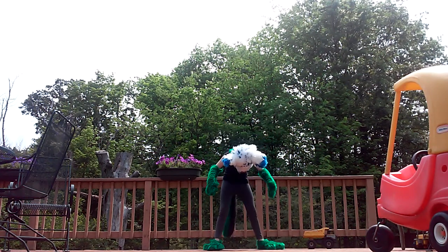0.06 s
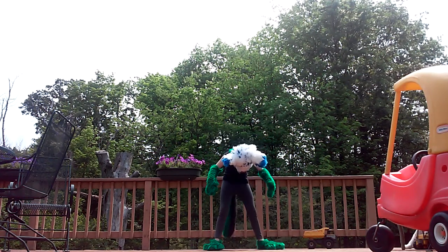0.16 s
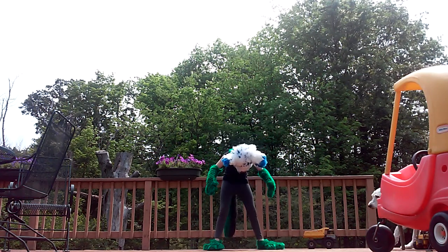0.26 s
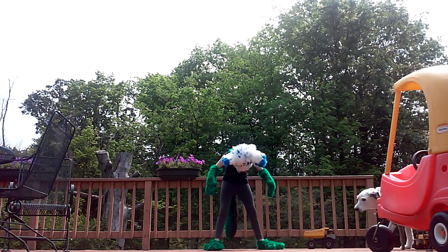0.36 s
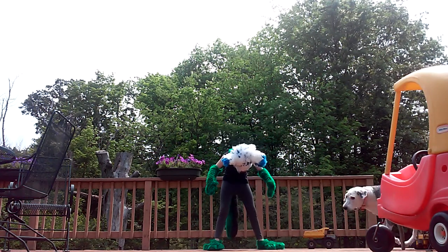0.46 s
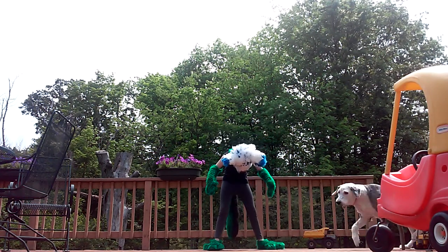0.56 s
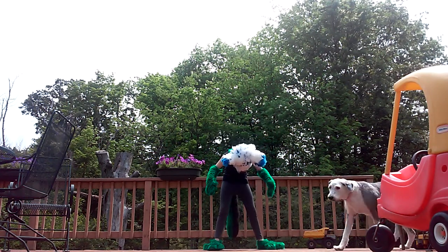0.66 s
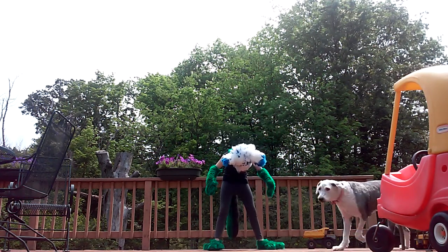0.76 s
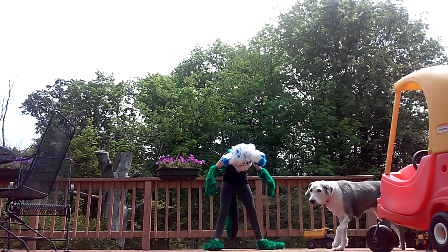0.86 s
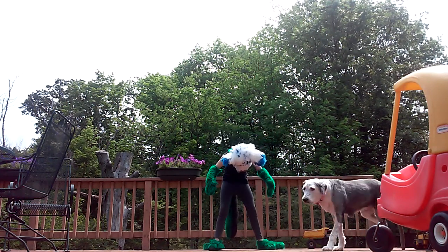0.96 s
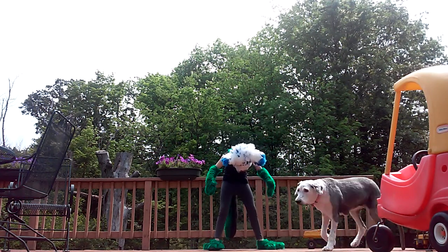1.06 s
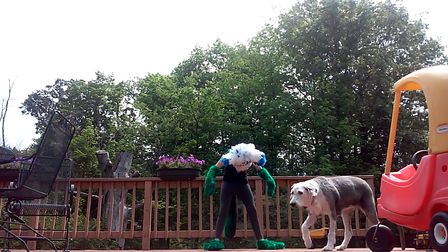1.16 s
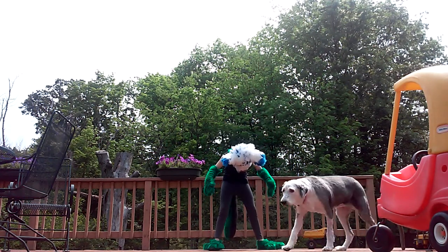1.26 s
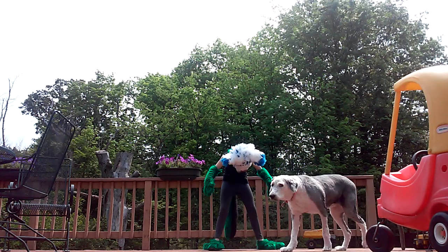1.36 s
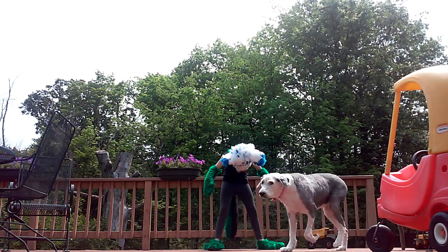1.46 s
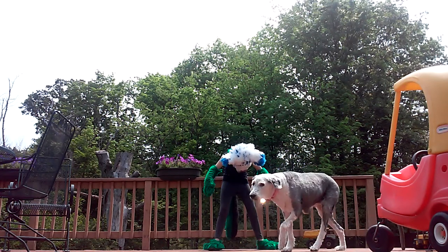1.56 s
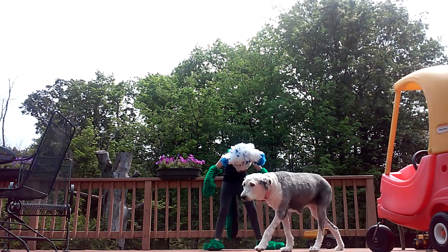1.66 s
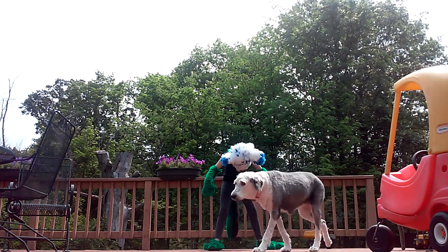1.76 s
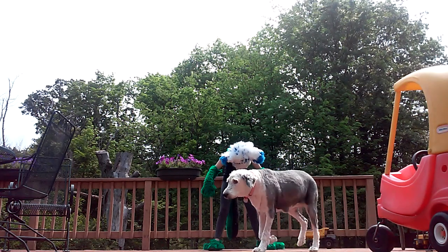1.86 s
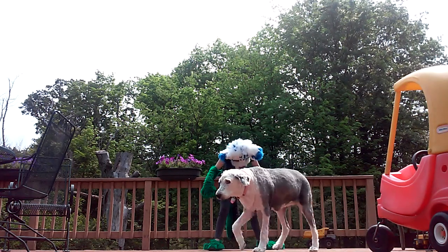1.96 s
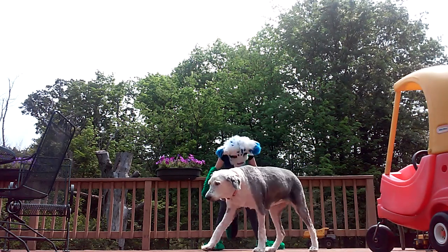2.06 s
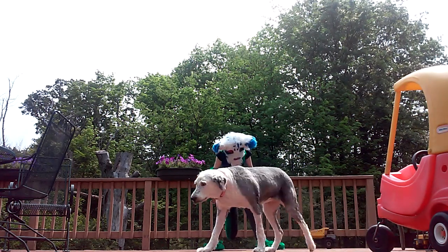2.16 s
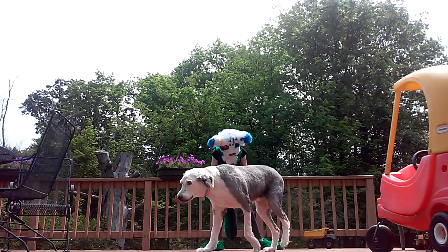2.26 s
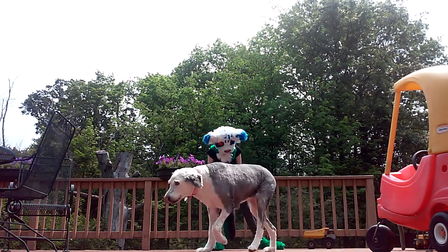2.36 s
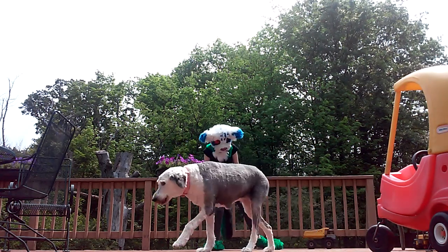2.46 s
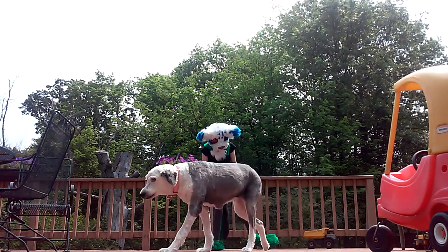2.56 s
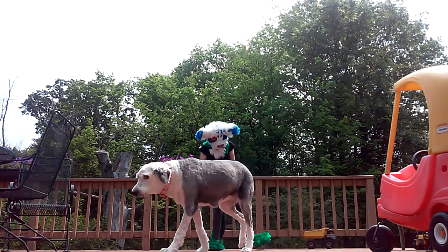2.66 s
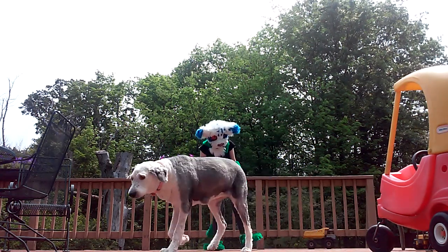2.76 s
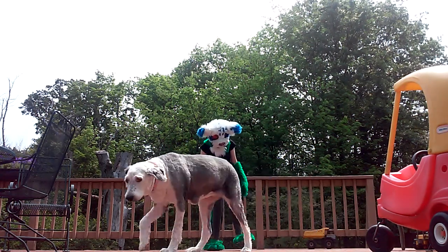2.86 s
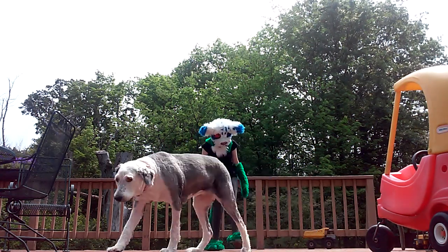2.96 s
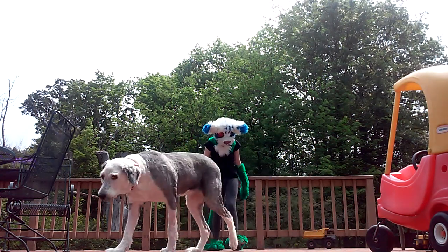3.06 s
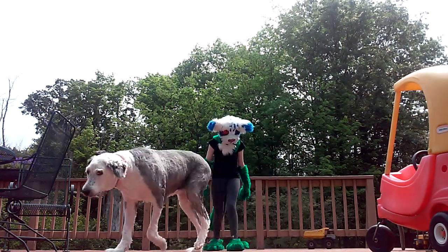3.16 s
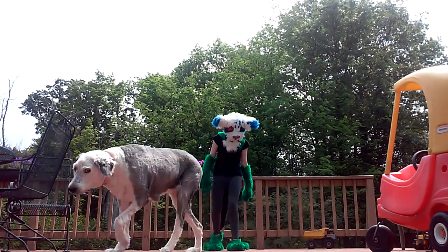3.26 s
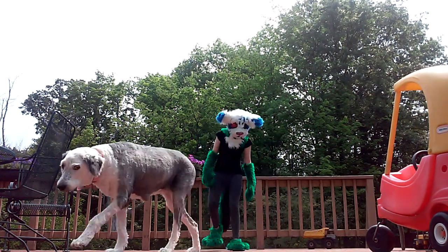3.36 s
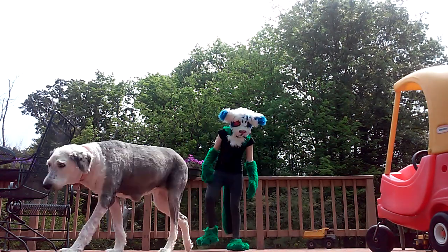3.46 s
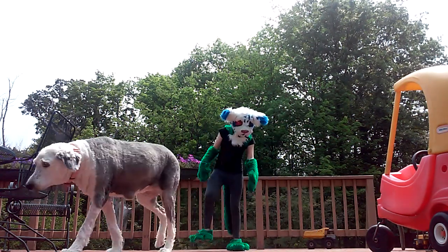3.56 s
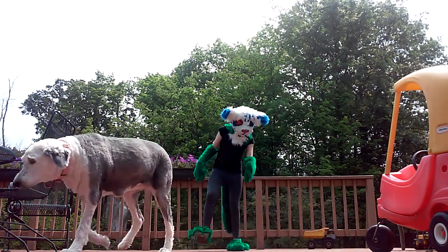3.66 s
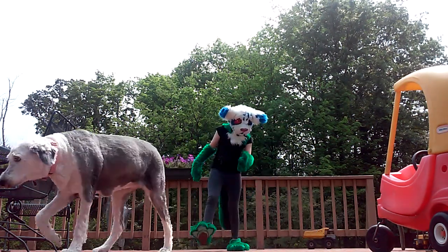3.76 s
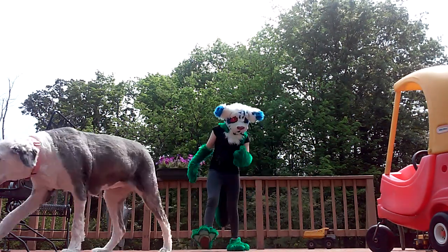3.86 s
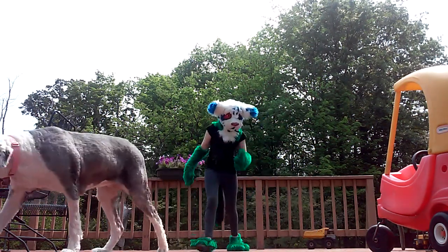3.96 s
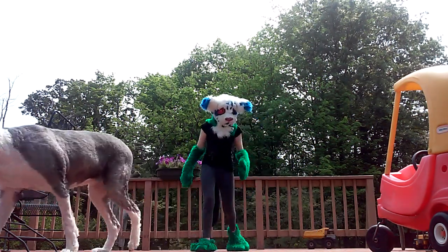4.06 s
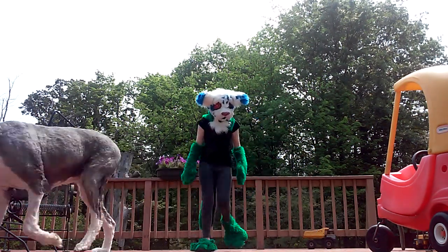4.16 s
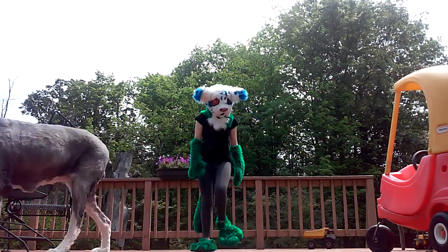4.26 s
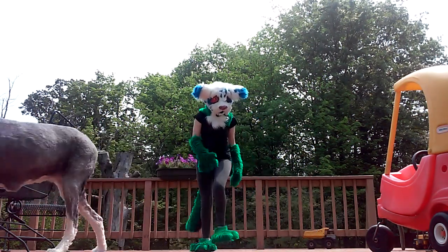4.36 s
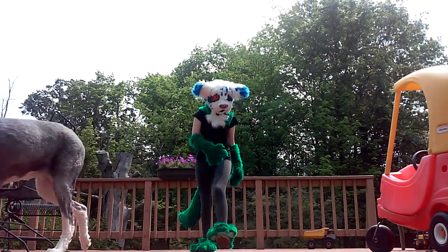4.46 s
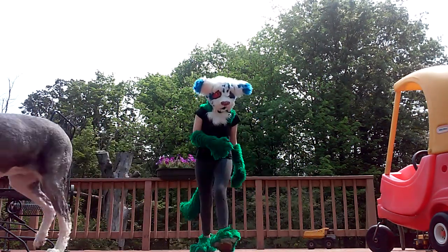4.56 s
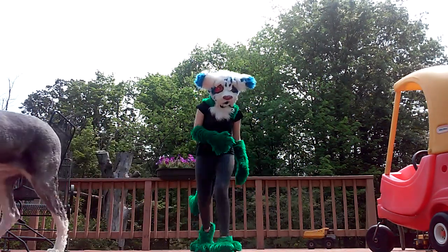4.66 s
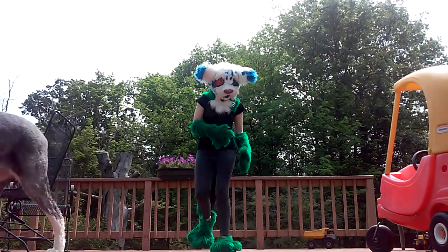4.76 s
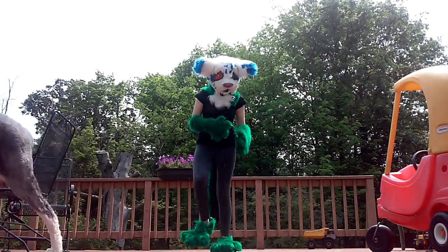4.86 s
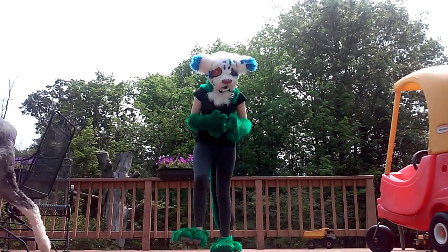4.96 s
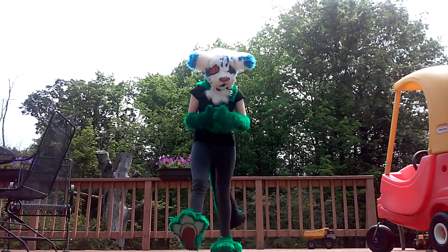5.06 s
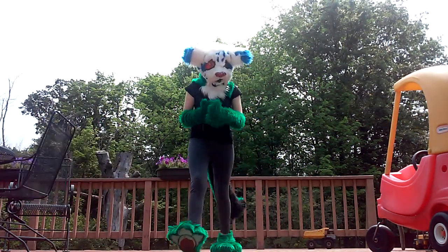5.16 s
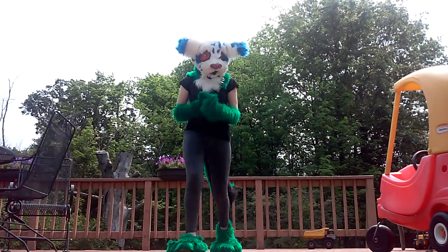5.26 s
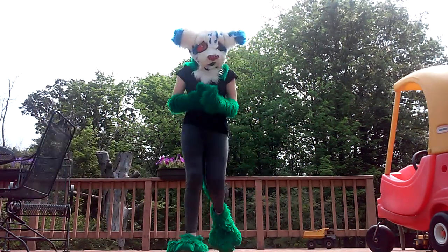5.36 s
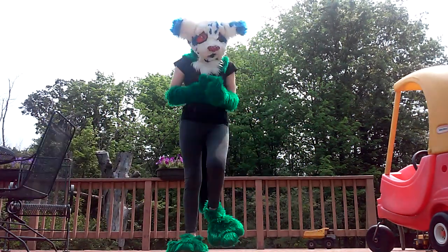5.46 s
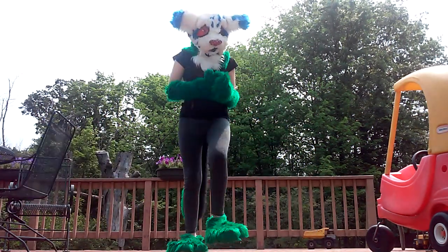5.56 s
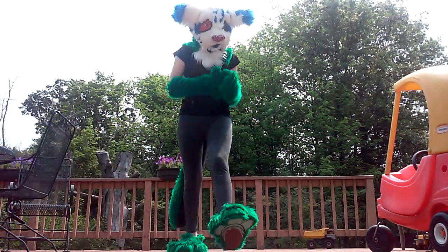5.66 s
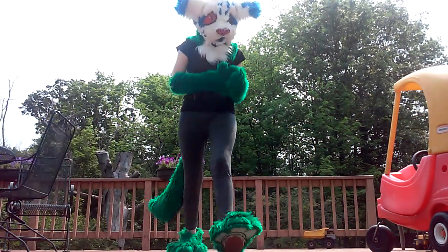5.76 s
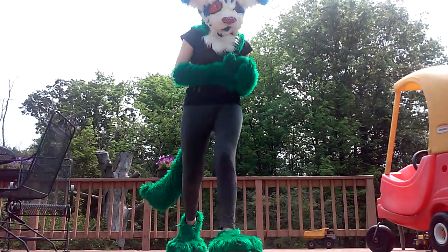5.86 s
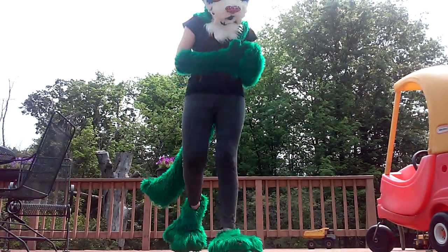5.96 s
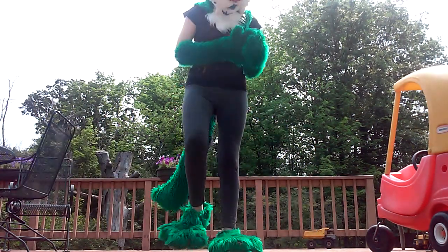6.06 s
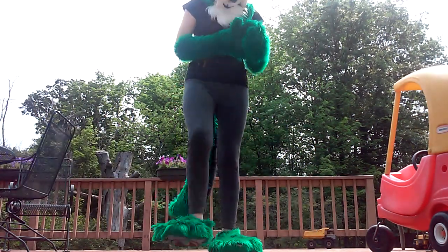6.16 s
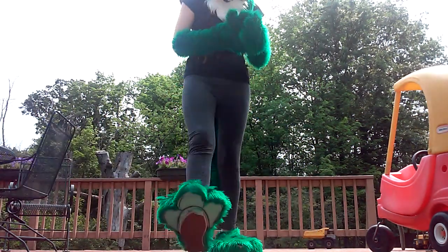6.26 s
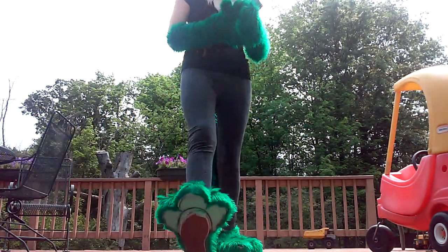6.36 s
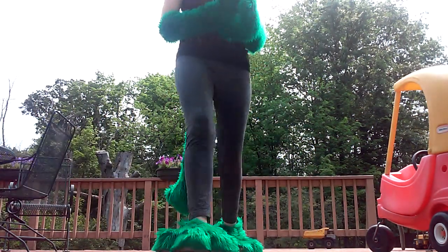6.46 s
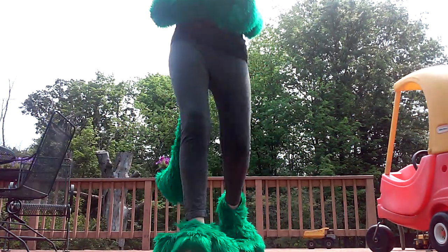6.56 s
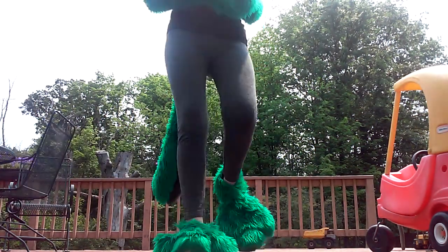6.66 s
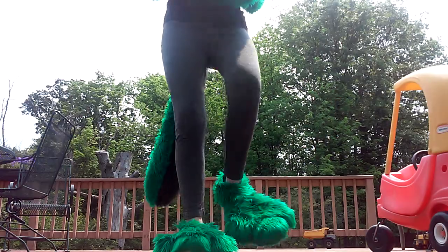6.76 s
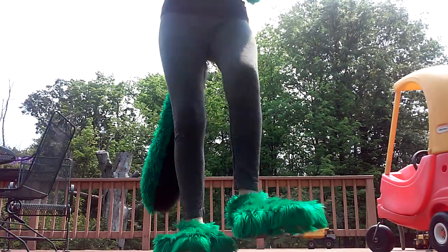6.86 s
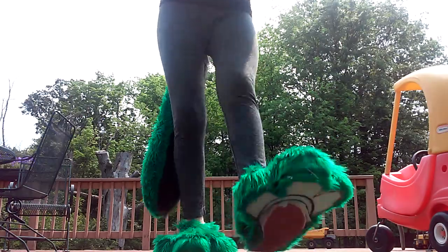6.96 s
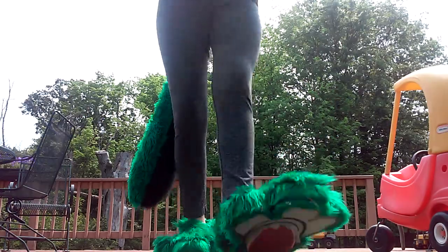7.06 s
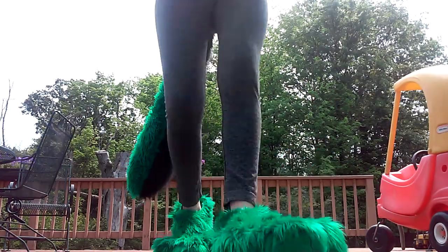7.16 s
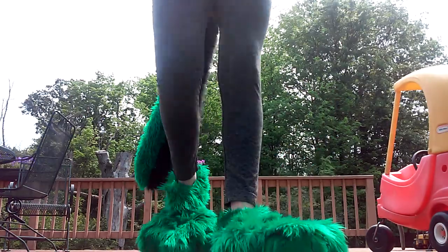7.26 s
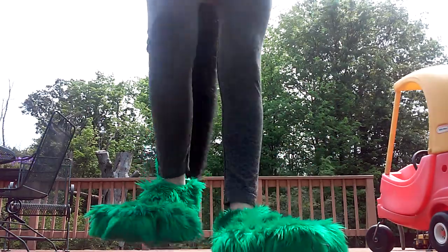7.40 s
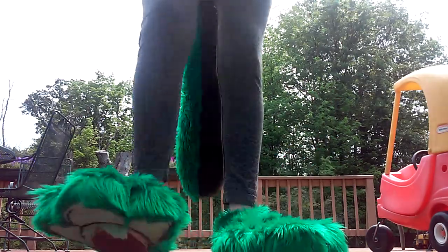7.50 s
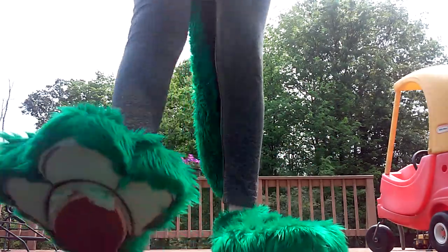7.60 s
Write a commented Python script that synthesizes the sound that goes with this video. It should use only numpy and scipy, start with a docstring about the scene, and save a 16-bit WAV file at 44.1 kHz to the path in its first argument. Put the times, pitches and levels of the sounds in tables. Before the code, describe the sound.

Dog tags clink and claws click over hollow deck boards, followed by slow, deep, padded footfalls approaching over a faint wavering hum.

```python
"""A wooden deck outdoors: a dog walks across, claws tapping and collar tags clinking, while padded feet
step heel and toe towards a microphone lying on the boards. Footfalls are short tone bursts with scattered
repeats, claws are grainy noise ringing board modes, tags are decaying sines with ticks. Shaped noise makes
the rumble, scuffing, high hiss and air; a low wavering tone hums underneath."""
import sys
import numpy as np
from scipy import signal
from scipy.fft import rfft, irfft
from scipy.io import wavfile
from scipy.ndimage import uniform_filter1d

SR = 44100
rng = np.random.default_rng(int(sys.argv[2]) if len(sys.argv) > 2 else 0)


def generate_wav(sig):
    """Save sig (samples, or channels by samples) to the path in sys.argv[1] as 16-bit PCM at SR."""
    pcm = np.round(np.clip(np.atleast_2d(sig).T, -1, 1) * 32767).astype(np.int16)
    wavfile.write(sys.argv[1], SR, pcm)


N = 336483


def gain_of(db):
    """Decibels to amplitude gain."""
    return 10 ** (np.asarray(db) / 20)


def evened(x):
    """Scales to rms 1."""
    return x / np.sqrt(np.mean(x ** 2) + 1e-20)


def add(mix, start_s, sound):
    """Mixes a sound in at a time, cut at the end of the mix."""
    part = mix[round(start_s * SR):][:len(sound)]
    part += sound[:len(part)]


def along(table, column):
    """One column of a timed curve, interpolated at every sample."""
    rows = np.array(table)
    return np.interp(np.arange(N) / SR, rows[:, 0], rows[:, column])


def coloured(x, spectrum, bright_db=0):
    """Filters by a (freq_hz, gain_db) table; bright_db fades in from 1600 to 2200 Hz."""
    table_hz, table_db = np.transpose(spectrum)
    hz = np.fft.rfftfreq(len(x), 1 / SR)
    db = np.interp(np.log(hz + 1), np.log(table_hz + 1), table_db, left=-90, right=-90)
    db += bright_db * np.clip((hz - 1600) / 600, 0, 1)
    return irfft(rfft(x) * gain_of(db), len(x))


def lumpy(window_s, spread_db):
    """White noise whose level wanders at random, smoothed over window_s."""
    window = np.hanning(int(window_s * SR) + 3)
    slow = evened(signal.oaconvolve(rng.standard_normal(N), window, "same"))
    return rng.standard_normal(N) * gain_of(spread_db * slow)


# hum level: time_s, level_db
HUM_LEVEL = [(0, -36), (.5, -51), (1.35, -41.5), (1.85, -51), (2.35, -34), (3.0, -44.5), (3.9, -47),
             (4.1, -33.5), (4.8, -35.5), (5.65, -43), (6.15, -37.5), (6.4, -56.5), (7.1, -52), (7.3, -41),
             (7.63, -39)]
HUM_HZ = 105.05


def hum():
    """A low tone; slow complex noise makes its level and phase waver."""
    window = np.hanning(int(.07 * SR))[None]
    waver = signal.oaconvolve(rng.standard_normal((2, N)), window, "same", axes=1)
    wobble = 1 + 0.51 * (evened(waver[0]) + 1j * evened(waver[1]))
    carrier = np.exp(2j * np.pi * HUM_HZ * np.arange(N) / SR)
    return gain_of(along(HUM_LEVEL, 1)) * evened((wobble * carrier).real)


# colour of the air: freq_hz, gain_db
AIR_COLOUR = [(12, -66), (20, -12), (117, 5.5), (169, -30), (314, -30), (599, -45), (1510, -24.5),
              (1900, -74), (2510, -45), (5360, -39), (13200, -36), (15750, -30), (16000, -89)]
# colour of the deep sway: freq_hz, gain_db
SWAY_COLOUR = [(12, -54), (25, -33), (45, -15), (75, -11), (95, -10.5), (130, -38)]
AIR_DB = -49.5
SWAY_DB, SWAY_DB_PER_HUM_DB = -48.5, 0.72  # SWAY_DB holds at a hum of -43 dB


def outdoors():
    """Faint air noise of slowly wandering level, and a deep gusty sway that swells with the hum."""
    air = gain_of(AIR_DB) * evened(coloured(lumpy(0.95, 1.0), AIR_COLOUR))
    sway_db = SWAY_DB + SWAY_DB_PER_HUM_DB * (along(HUM_LEVEL, 1) + 43)
    sway = gain_of(sway_db) * evened(coloured(lumpy(0.097, 1.5), SWAY_COLOUR))
    return air + sway


# swells of hiss and scuffing, some as short as the crack of a knock:
# middle_s, hiss_db, length_s, scuff_db
SWELLS = [(.55, -50, 0.27, -57), (0.702, -37, 0.19, -58), (1.436, -51, 0.27, -60.5),
          (2.434, -69, 0.47, -60), (2.523, -44, 0.15, -57.5), (2.834, -48, 0.29, -63),
          (4.892, -40.5, 0.085, -57), (5.42, -50.5, 0.96, -68), (6.055, -45, 0.53, -60.5),
          (6.708, -50.5, 0.34, -64.5), (7.137, -46, 0.039, -67), (7.32, -46.5, 0.73, -72),
          (7.416, -32.5, 0.045, -51)]


def swelling(column):
    """Summed power of the swells over time, from the hiss (1) or scuff (3) column."""
    power = np.zeros(N)
    for row in SWELLS:
        middle_s, level_db, length_s = row[0], row[column], row[2]
        shape = np.hanning(int(length_s * SR)) ** 2
        add(power, middle_s - length_s / 2, gain_of(2 * level_db) * shape)
    return power


# sudden rises of high hiss, each fading slowly: start_s, level_db
HISS_RISES = [(0, -53), (0.069, -42.5), (.24, -41.5), (0.478, -38.5), (.887, -43), (1.25, -45.5),
              (1.33, -46), (1.72, -45.5), (2.07, -48), (2.286, -43), (2.8, -45), (3.07, -50),
              (3.501, -56.5), (3.93, -55.5), (4.148, -49.5), (4.4, -47), (4.61, -45), (4.87, -51),
              (5.18, -51), (5.779, -51.5), (5.87, -52), (6.543, -51), (6.94, -51.5)]
# colour of the high hiss: freq_hz, gain_db
HISS_COLOUR = [(2650, -25), (4500, -32), (6340, -19.5), (9120, -11.5), (9950, -12.5), (13000, -2.5),
               (15750, -15), (15950, -51), (16200, -79)]
HISS_T60_S = 1.68


def hiss():
    """High noise that rises suddenly and fades slowly; the powers of rises and swells add."""
    power, t = swelling(column=1), np.arange(SR) / SR
    for start_s, level_db in HISS_RISES:
        onset = np.minimum(t / 0.0025, 1)
        add(power, start_s, gain_of(2 * (level_db - 60 * t / HISS_T60_S)) * onset)
    return np.sqrt(power) * evened(coloured(lumpy(0.0071, 1.65), HISS_COLOUR))


def grit():
    """Noise bursts from scattered small catches of pads on the wood grain, some larger."""
    sizes_db = 6.9 * np.minimum(rng.exponential(1, N), 2)
    catches = (rng.random(N) < 40 / SR) * gain_of(sizes_db)  # about 40 per s
    decay = gain_of(-60 * np.arange(2000) / SR / 0.13)
    return 0.3 * signal.oaconvolve(catches, decay)[:N] * rng.standard_normal(N)


# how hard walking shakes the deck: time_s, rumble_db
MOTION = [(0, -42), (.6, -34.5), (.85, -40), (1.4, -35.5), (1.7, -46), (2.12, -47.5), (2.45, -37.5),
          (3.0, -46), (3.4, -46.5), (3.85, -59.5), (4.15, -38.5), (4.5, -39.5), (5.1, -47.5), (5.75, -46.5),
          (6.08, -44), (6.35, -47.5), (7.1, -50.5), (7.3, -35.5), (7.63, -44)]
# colour of the shaken boards: freq_hz, gain_db
RUMBLE_COLOUR = [(71, -14), (120, -8), (134, -2.5), (205, -0.5), (349, -2), (441, -10), (511, -15),
                 (650, -34.5), (840, -69)]
# colour of pads on planks: freq_hz, gain_db
SCUFF_COLOUR = [(350, -40), (600, -5), (704, -9), (863, 0.5), (1010, 0), (1230, -26.5), (1470, -25),
                (1750, -18.5), (2270, -17.5), (2710, -20), (3020, -15), (3540, -25), (4380, -20),
                (5000, -41), (6500, -92)]
# colour of the rasp within the swells: freq_hz, gain_db
RASP_COLOUR = [(1100, -16), (1480, 3), (1950, -33)]
SCUFF_DB, SCUFF_DB_PER_RUMBLE_DB = -58, 0.54  # SCUFF_DB holds at a rumble of -40.5 dB
BOOM_DB, BOOM_PITCH_FACTOR = 18, 1.21  # low sound of a swell: over its scuffing, above the rumble


def motion():
    """Walking shakes the boards and scuffs the planks: rumble, boom, rasp and scuff as shaped noise."""
    rumble_db = along(MOTION, 1)
    rumble = gain_of(rumble_db) * evened(coloured(lumpy(0.056, 2.86), RUMBLE_COLOUR))
    swell = np.sqrt(swelling(column=3))
    boom_colour = np.multiply(RUMBLE_COLOUR, [BOOM_PITCH_FACTOR, 1])
    boom = gain_of(BOOM_DB) * swell * evened(coloured(lumpy(0.09, 3.7), boom_colour))
    rasp = swell * evened(coloured(lumpy(0.018, 4.9), RASP_COLOUR))
    scuff_db = SCUFF_DB + SCUFF_DB_PER_RUMBLE_DB * (rumble_db + 40.5)
    scuff = evened(coloured(lumpy(0.027, 1.8) + grit(), SCUFF_COLOUR))
    return rumble + boom + rasp + (gain_of(scuff_db) + swell) * scuff


# contacts sounding the low note of the collar hardware: start_s, level_db, ring_t60_s
PINGS = [(0.1635, -50, 0.25), (0.512, -37, 0.29), (0.5893, -46.5, 0.21), (0.6659, -53, 0.51),
         (0.8866, -42, 0.22), (0.949, -46.5, 0.14), (1.328, -46, 0.093), (1.7205, -53, 0.21),
         (2.799, -35.5, 0.13), (2.842, -37.5, 0.084), (2.875, -53, 0.19), (4.7277, -57, 0.22),
         (5.4061, -59, 0.19), (5.895, -52, 0.22), (5.9686, -46, 0.06), (6.162, -48, 0.077)]
PING_HZ = 6187


def pings():
    """A decaying sine of wavering level, damped by the next contact."""
    out, t = np.zeros(N), np.arange(SR // 2) / SR
    ends_s = [row[0] for row in PINGS[1:]] + [N / SR]
    for (start_s, level_db, t60_s), end_s in zip(PINGS, ends_s):
        noise = rng.standard_normal(len(t))
        swing = gain_of(2.5 * evened(signal.oaconvolve(noise, np.hanning(900), "same")))
        stopped = np.clip((end_s - start_s - t) / .001, 0, 1)
        level = gain_of(level_db - 60 * t / max(t60_s, .02)) * swing * stopped
        onset = np.minimum(t / 0.00055, 1)
        add(out, start_s, level * onset * np.sin(2 * np.pi * PING_HZ * t))
    return out


# contacts of the two tags: start_s, tick_db, base_t60_s, first_tag_db, second_tag_db
CLINKS = [(0.0697, -5, 0.13, -25, -38), (0.1632, -15, .36, -24, -28), (0.246, -23, 0.062, -20, -19.5),
          (0.387, -11, 0.13, -41.5, -27), (.449, -14, 0.26, -33, -27), (0.481, -1, .12, -36, -37),
          (0.49, -0.5, 0.44, -20, -15), (0.5152, -21, 0.31, -13, -13), (0.5654, 1.5, 0.066, -18, -18),
          (.6665, -36, 0.39, -31, -41), (0.737, -15, 0.23, -26.5, -31), (.887, -2.5, 0.58, -20, -13.5),
          (0.9232, -8, 0.25, -24, -16), (0.99, -2.5, 0.33, -31, -24.5), (1.246, -28, 0.081, -21.5, -51),
          (1.327, -13, 0.043, -8.5, -25), (1.358, -13, 0.27, -27, -34), (1.719, -6.5, 0.17, -18, -8),
          (1.8714, -15, 0.19, -40, -38), (2.048, -40, 0.042, -60, -44), (2.074, -24, 0.034, -45, -23.5),
          (2.1213, -28, 0.041, -26, -29), (2.1585, -14, 0.16, -45, -28), (2.2842, -3, 0.12, -37, -10.5),
          (2.3144, -8, 0.031, -18, -40), (2.7968, -1.5, 0.44, -11, -4.5), (2.811, 0, 0.18, -12, -19),
          (2.821, -8, 0.92, -16, -7), (2.839, 2, 0.17, -25, -14), (2.852, -10, .15, -26, -20),
          (2.873, -20, .15, -28, -13), (2.892, -14, .12, -33, -26), (2.997, -16, .04, -50, -50),
          (3.189, -7, 0.23, -50, -27), (3.51, -36, 0.12, -38, -39), (3.575, -29, 0.045, -28, -49),
          (4.155, -12.5, .06, -51, -54), (4.225, -14.5, 0.076, -45, -23), (4.398, -3.5, 0.055, -42, -37),
          (4.427, -24, 0.13, -33, -27), (4.52, -23, 0.037, -41, -31), (4.613, -9, 0.073, -13, -11.5),
          (4.636, -10, 0.016, -33, -18), (4.712, -34.5, 0.011, -46, -24), (4.725, -14, 0.013, -10.5, -5.5),
          (4.73, -12, .1, -24, -42), (4.8737, -30, 0.021, -16, -12.5), (5.008, -27, 0.026, -22, -42),
          (5.18, -23, 0.023, -10.5, -18), (5.274, -18.5, 0.057, -20, -17), (5.332, -29, 0.049, -41, -24),
          (5.772, -20, 0.044, -47, -50), (5.799, -35, 0.056, -34, -44), (5.8284, -31, 0.062, -25, -53),
          (5.852, -31, 0.083, -35, -34), (5.871, -22, 0.08, -29, -43), (5.907, -24, .04, -34, -50),
          (5.935, -16, 0.014, -11, -33), (5.968, -12, 0.084, -25, -22), (6.05, -28, .04, -57, -50),
          (6.091, -4.5, 0.05, -42, -34), (6.638, -13.5, 0.13, -32, -29), (6.942, -22, 0.058, -29, -32)]
# mode pitches, one row per tag: mode_1_hz, mode_2_hz
TAG_HZ = [
    [12913, 15491],
    [9116, 12600],
]
# the same modes in order: level_db, t60_factor, gain_db_per_t60_doubling (0 dB at 0.1 s)
TAG_MODES = [(-1, 0.79, -1.5), (-16.5, 1.8, 0), (-20, 0.63, 0.5), (-7.5, 1.16, -3.5)]
# colour of the ticks: freq_hz, gain_db
TICK_COLOUR = [(4000, -60), (7000, -16.5), (9000, -6), (12000, -1.5), (13500, 6), (15700, -6), (16100, -31),
               (17000, -50)]
SPREAD_DB = 1.5  # random spread of the weaker modes per contact


def tags():
    """Each contact ticks, damps the tag modes and starts them afresh; faint rattles follow."""
    out, ticks, t = np.zeros(N), np.zeros(N), np.arange(SR // 2) / SR
    mode_hz = np.array(sum(TAG_HZ, []))[:, None]
    mode_db, t60_factor, doubling_db = np.transpose(TAG_MODES)[:, :, None]
    ends_s = [row[0] for row in CLINKS[1:]] + [N / SR]
    for (start_s, tick_db, t60_s, *rings_db), end_s in zip(CLINKS, ends_s):
        ring_s = max(t60_s, .01)
        stopped = np.clip((end_s - start_s - t) / 0.005 + 1, 0, 1)
        spread, detune = rng.standard_normal((2, len(mode_hz), 1))
        struck_db = np.repeat(rings_db, [len(tag) for tag in TAG_HZ])[:, None]
        struck_db = struck_db + SPREAD_DB * spread * (mode_db < -4) + doubling_db * np.log2(ring_s * 10)
        noise = rng.standard_normal((len(mode_hz), len(t)))
        turning = signal.oaconvolve(noise, np.hanning(450)[None], "same", axes=1)
        swing = gain_of(4 * evened(turning))  # tags turn and chatter as they ring
        level = gain_of(mode_db + struck_db - 60 * t / (t60_factor * ring_s)) * swing * stopped
        ring = (level * np.sin(2 * np.pi * mode_hz * (1 + 0.00025 * detune) * t)).sum(0)
        add(out, start_s, ring * np.minimum(t / 0.0014, 1))

        rattle_decay = gain_of(-17 - 60 * np.arange(4000) / SR / .3)
        touches = (rng.random(4000) < 50 / SR) * rattle_decay
        touches[0] = 1
        tick_t = np.arange(600) / SR
        tick = gain_of(tick_db - 60 * tick_t / 0.0071) * np.minimum(tick_t / 0.0026, 1)
        tick *= np.sign(rng.standard_normal(600))
        add(ticks, start_s, signal.oaconvolve(touches, tick))
    # rails and wall throw them back
    echoes = rng.standard_normal(3000) * gain_of(-31.5 - 60 * np.arange(3000) / SR / 0.05)
    echoes[0] = 1
    return signal.oaconvolve(out + coloured(ticks, TICK_COLOUR), echoes)[:N]


# claws and soles on the planks: start_s, level_db, brightness_db (relative), claw_hz
KNOCKS = [(0.431, -35, -24, 2620), (0.459, -44, -6, 3850), (0.513, -46.5, -3, 4500), (.532, -34, -14, 4380),
          (0.566, -50, -1, 3060), (0.596, -37.5, -18.5, 3080), (0.653, -28, -24, 2480),
          (0.855, -32, -20.5, 2460), (1.122, -43.5, -10, 2980), (1.336, -38, -16, 3130),
          (1.414, -58, 2, 3000), (1.472, -38, -27, 2990), (1.536, -43, -6.5, 2980),
          (1.738, -36.5, -9, 2580), (2.171, -28.5, -12.5, 2850), (2.326, -38, -23.5, 2490),
          (2.484, -40.5, -15, 3260), (3.002, -39.5, -17, 3060), (3.17, -43.5, -13, 2480),
          (3.438, -35.5, -12, 2980), (3.661, -39.5, -13, 2600), (3.933, -32.5, -12.5, 2380),
          (4.152, -32, -20.5, 3060), (4.394, -23.5, -5, 2330), (4.583, -42.5, -15, 2380),
          (4.69, -37.5, -16, 2440), (4.73, -38, -17.5, 2960), (4.894, -24, -8.5, 2440),
          (5.064, -31.5, -17.5, 3400), (5.221, -31, -21.5, 3000), (5.251, -36, -16, 2400),
          (5.305, -39.5, -20, 2300), (5.376, -30.5, -21, 2380), (5.434, -63, 25, 4190),
          (5.632, -41, -21, 2040), (5.751, -36, -29, 2080), (5.877, -17, -11.5, 2100),
          (6.052, -33, -20, 2380), (6.079, -32, -8, 2380), (6.178, -37.5, -18, 2130),
          (6.214, -34.5, -18.5, 2460), (6.398, -43, -23, 2320), (6.578, -37, -19.5, 2040),
          (6.879, -33, -25, 2100), (7.215, -55.5, 8.5, 2960), (7.233, -38.5, -13.5, 2010),
          (7.4, -29.5, -4, 2710), (7.42, -37, -2, 3170)]
# colour of the plank: freq_hz, gain_db
PLANK_COLOUR = [(450, 20.5), (700, -47.5), (900, 21.5), (1150, 4.5), (1450, 5), (2050, -12.5), (2500, -2.5),
                (3200, -6), (4400, -16.5), (5300, -20), (16000, -31)]
# board modes under the claws: freq_hz, level_db
BOARD_MODES = [(830, 4), (960, 2.5), (1450, 4.5), (2150, -4), (2450, 3), (3000, -1.5), (3500, -17),
               (4300, -2)]
# decay of the scrape over the walk: time_s, t60_s
KNOCK_T60 = [(0, 0.063), (2.5, 0.25), (3.6, 0.063), (7.63, 0.065)]
KNOCK_RISE = 0.035  # rise time as a share of the t60


def knocks():
    """A grainy scrape of small contacts in the plank colour; it rings the board modes and the claw."""
    out, t = np.zeros(N), np.arange(SR // 4) / SR
    board_hz, board_db = np.transpose(BOARD_MODES)[:, :, None]
    for start_s, level_db, bright_db, claw_hz in KNOCKS:
        t60_s = np.interp(start_s, *np.transpose(KNOCK_T60))
        noise, grain = rng.standard_normal((2, len(t)))
        grain = gain_of(3.24 * evened(uniform_filter1d(grain, 60)))
        decay = gain_of(-60 * t / max(t60_s, .01))
        decay += gain_of(-17.5 - 60 * t / 0.47)  # the deck's faint tail
        contacts = grain * decay * np.minimum(t / (KNOCK_RISE * t60_s), 1)
        knock = np.roll(coloured(noise * contacts, PLANK_COLOUR, bright_db + 13.0), 88)
        knock *= np.clip(np.minimum(t / .002, (.2 - t) / .05), 0, 1)

        # mode levels and pitches vary at random from knock to knock
        varied_db = 2.8 * rng.standard_normal(board_hz.shape) + (bright_db + 10.5) * (board_hz > 1900)
        varied_hz = board_hz * (1 + 0.0514 * rng.standard_normal(board_hz.shape))
        board_t60_s = 0.075 * (1000 / board_hz) ** 0.7
        board_level = gain_of(board_db + varied_db - 60 * t / board_t60_s)
        board_ring = (board_level * np.sin(2 * np.pi * varied_hz * t)).sum(0)
        claw_ring = gain_of(-60 * t / .03) * np.sin(2 * np.pi * claw_hz * t)
        drive = noise * contacts ** 3.06
        board = signal.oaconvolve(drive, board_ring)[:len(t)]
        claw = signal.oaconvolve(drive, claw_ring)[:len(t)]

        sound = knock / abs(knock).max() + 0.59 * board / abs(board).max()
        sound += gain_of(bright_db + 3.5) * claw / abs(claw).max()
        add(out, start_s - .0025, gain_of(level_db) * sound)
    return out


# padded footfalls and paw thumps: start_s, level_db, pitch_hz
THUDS = [(0.253, -27, 216), (0.328, -17.5, 185), (0.351, -21, 332), (0.654, -26, 287), (0.928, -26, 274),
         (1.327, -21.5, 316), (1.392, -27, 212), (1.453, -25, 265), (1.734, -28.5, 323), (2.177, -22, 360),
         (2.497, -25, 302), (3.238, -17.5, 250), (3.32, -26.5, 266), (3.428, -30.5, 258),
         (4.072, -16.5, 261), (4.118, -24, 287), (4.393, -20.5, 275), (4.703, -6.5, 283), (4.772, -13, 322),
         (4.786, -14.5, 286), (5.307, -4, 296), (5.329, -20, 260), (5.367, -21.5, 218), (5.668, -31, 258),
         (5.909, -14.5, 298), (5.934, -14, 300), (5.987, -11.5, 327), (6.539, -5.5, 287), (6.568, -14, 279),
         (6.63, -16.5, 305), (6.638, -8.5, 304), (7.211, -14, 138), (7.222, -16.5, 313), (7.268, -7, 369),
         (7.328, -12, 277)]
SOLE_HZ = 784
NEAR_FROM_S, NEAR_DB_PER_S = 6.37, 12  # last steps close in: sole gains this, weight twice it


def thuds():
    """A soft blow of a few cycles; the joists pass it on as scattered, dying repeats."""
    out, t = np.zeros(N), np.arange(SR // 2) / SR
    blow_t = t[:2000]
    for start_s, level_db, pitch_hz in THUDS:
        turns = blow_t * pitch_hz
        swell = np.exp(-((turns - 1.3) / np.where(turns < 1.3, .7, 1.3)) ** 2)
        blow = -np.sin(2 * np.pi * turns) * swell
        near_db = NEAR_DB_PER_S * max(start_s - NEAR_FROM_S, 0)
        # the weight bends the joists
        weight = np.sin(2 * np.pi * 0.31 * turns) * np.exp(-((turns - 2.2) / 2.1) ** 2)
        blow -= gain_of(2 * near_db - 32.0) * weight
        # the harder sole under the padding
        sole = np.sin(2 * np.pi * SOLE_HZ * blow_t) * np.exp(-((turns - 1.8) / 1.0) ** 2)
        blow += gain_of(near_db - 31.5) * sole

        decay = gain_of(-60 * t / 0.085) + gain_of(-13.5 - 60 * t / 0.46)
        repeats = rng.standard_normal(len(t)) * decay * np.minimum(t / 0.01, 1) ** 2
        ring = signal.oaconvolve(repeats, blow)
        sound = gain_of(-6) * ring / abs(ring).max()
        add(sound, 0, blow / abs(blow).max())
        add(out, start_s + 0.001, gain_of(level_db) * sound)
    return out


def scene():
    """All sources sum at one microphone, the same in both channels."""
    background = hum() + outdoors()
    moving = hiss() + motion()
    collar = pings() + tags()
    return np.tile(background + moving + collar + knocks() + thuds(), (2, 1))


EDGE_HZ = 16900


def record(dry):
    """Low-pass at EDGE_HZ: the sound stays below 16.9 kHz."""
    lowpass = signal.firwin(511, EDGE_HZ, window=("kaiser", 9), fs=SR)
    return signal.oaconvolve(dry, lowpass[None], "same", axes=1)


dry = scene()
out = record(dry)
generate_wav(out)
```